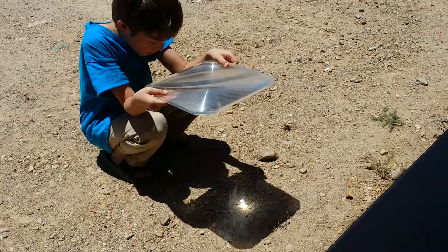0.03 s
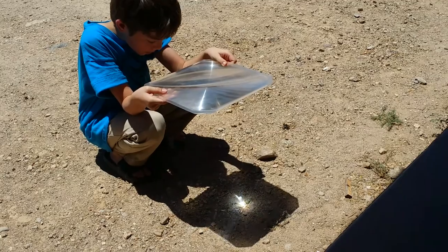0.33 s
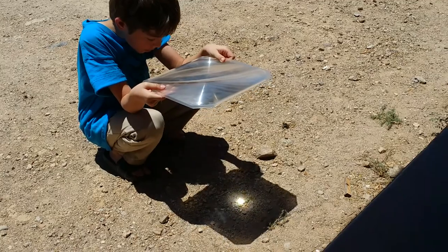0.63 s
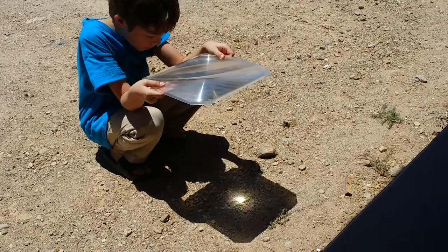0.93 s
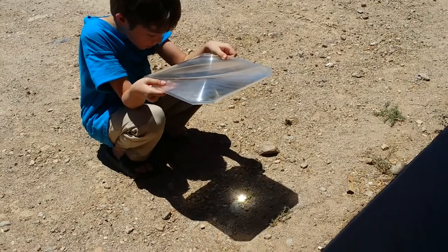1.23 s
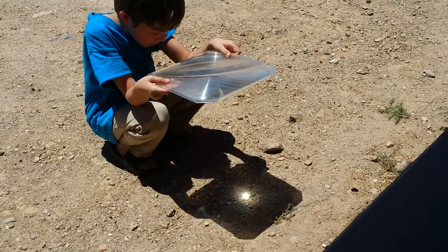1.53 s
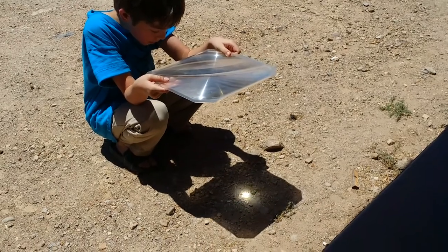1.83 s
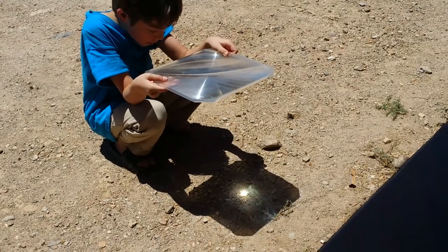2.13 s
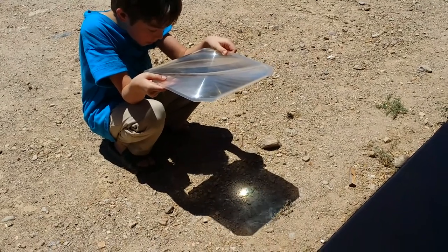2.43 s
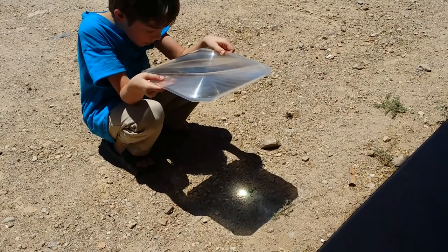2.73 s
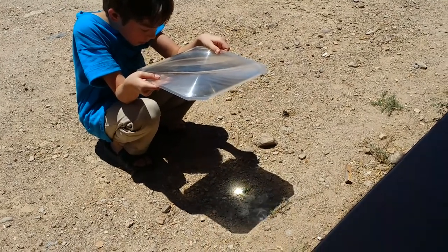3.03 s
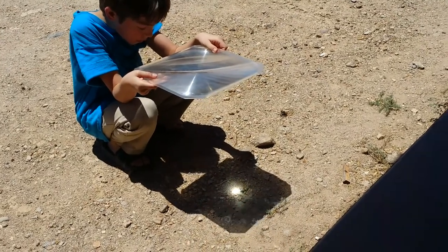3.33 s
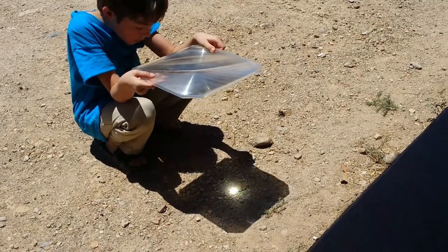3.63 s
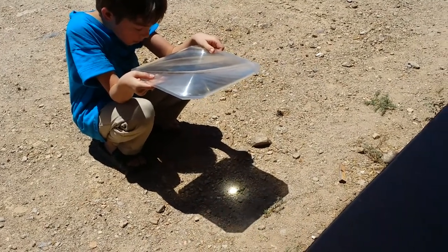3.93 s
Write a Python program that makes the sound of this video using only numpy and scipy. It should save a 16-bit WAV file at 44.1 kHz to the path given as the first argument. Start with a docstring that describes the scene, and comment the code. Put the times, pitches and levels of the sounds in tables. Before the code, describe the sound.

Bits of dry ground burst with brief, sharp clicks under a sunlit lens, with short gaps between them. Soft wind buffets the microphone unevenly, and a faint outdoor hiss lies behind.

```python
"""Sunlight popping dry ground

A flat lens burns a spot on dry ground; heated bits burst with sharp, tiny pops. Each pop is one
pressure spike that rings the two microphone ports, scatters off things nearby and returns from the yard.
Gusts buffet the ports, mostly the right one, over a distant outdoor wash, a far-off whirr, a faint hiss,
a thin insect buzz and a brief high whine."""
import sys
import numpy as np
from scipy import signal
from scipy.fft import rfft, irfft, next_fast_len
from scipy.io import wavfile
from scipy.ndimage import uniform_filter1d, map_coordinates

SR = 44100
rng = np.random.default_rng(int(sys.argv[2]) if len(sys.argv) > 2 else 0)


def waveform_to_disk(signal):
    """Save audio, clipped to [-1, 1], as 16-bit WAV at the path in sys.argv[1]."""
    frames = np.transpose(np.atleast_2d(signal))
    scaled = np.clip(frames, -1, 1) * 32767
    samples = np.round(scaled).astype(np.int16)
    wavfile.write(sys.argv[1], SR, samples)


N = 4 * SR
TIME_S = np.arange(N) / SR
ECHO_TIME_S = np.arange(SR // 2) / SR


def amp(db):
    return 10 ** (np.asarray(db) / 20)


def unit_rms(x):
    return x / np.sqrt(np.mean(x ** 2) + 1e-20)


def unit_energy(x):
    return x / np.sqrt(np.sum(x ** 2) + 1e-20)


def at_hz(rows, hz):
    """(Hz, value) rows interpolated on a log axis."""
    knots_hz, values = np.transpose(rows)
    return np.interp(np.log(hz + 1), np.log(knots_hz + 1), values)


def over_time(rows):
    """(seconds, value) rows interpolated to every sample."""
    return np.interp(TIME_S, *np.transpose(rows))


def wobble(knots_per_s):
    """A smooth random curve."""
    return map_coordinates(rng.standard_normal(4096), [TIME_S * knots_per_s], mode="wrap")


def phrase(start_s, end_s, fade_s=0.025):
    """A gate that fades in, holds and fades out."""
    return np.clip(np.minimum(TIME_S - start_s, end_s - TIME_S) / fade_s, 0, 1)


def filtered(x, gain_at_hz):
    """Zero-phase filter."""
    size = next_fast_len(N + SR // 2)
    return irfft(rfft(x, size) * gain_at_hz(np.fft.rfftfreq(size, 1 / SR)), size)[..., :N]


def coloured(white, spectrum):
    """Noise of rms 1 shaped by (Hz, dB) rows."""
    return unit_rms(filtered(white, lambda hz: amp(at_hz(spectrum, hz))))


def narrow_noise(centre_hz, half_width_hz):
    """Narrow-band noise of rms 1."""
    white = rng.standard_normal(N)
    return unit_rms(filtered(white, lambda hz: 1 / (1 + ((hz - centre_hz) / half_width_hz) ** 2)))


# Port cavities, left then right. Each row: centre in Hz, width in Hz, resonance strength in dB.
PORT_RESONANCES = [(7190, 480, 1.5), (8190, 960, -5.5)]

def port_ring(hz, port, extra_db=0):
    """Gain of the small cavity behind a microphone port (0 left, 1 right)."""
    centre_hz, width_hz, db = PORT_RESONANCES[port]
    resonance = 1j * hz * width_hz / (centre_hz ** 2 - hz ** 2 + 1j * hz * width_hz)
    return np.abs(1 + amp(db + extra_db) * resonance)


# Each row: frequency in Hz, relative density in dB.
WASH_SPECTRUM = [(30, 3), (100, 7), (300, 7), (600, -1), (950, 0.5), (1250, -1), (1600, -8.5),
                 (2300, -13.5), (4000, -27), (9000, -41)]
# Each row: time in seconds, relative level in dB.
WASH_LEVELS = [(0, -63), (.82, -63.5), (.93, -68), (1.3, -62.5), (1.42, -68), (1.95, -63), (2.4, -65.5),
               (2.72, -64.5), (2.9, -69.5), (3.4, -64.5), (3.8, -64.5), (4, -71.5)]

def distant_wash(gain_db=7.5, correlation=0.27):
    """Low outdoor noise from far away, partly alike in both ports."""
    shared = np.sqrt(correlation) * rng.standard_normal(N)
    separate = np.sqrt(1 - correlation) * rng.standard_normal((2, N))
    return amp(over_time(WASH_LEVELS) + gain_db) * coloured(shared + separate, WASH_SPECTRUM)


# Each row: frequency in Hz, relative density in dB.
HISS_SPECTRUM = [(500, -17.5), (2500, 5.5), (4500, 4), (10000, 1.5), (14400, 4.5), (14800, -9)]
# Each row: time in seconds, relative level in dB.
HISS_LEVELS = [(0, -72), (.78, -73), (.97, -78), (1.25, -74.5), (1.55, -78), (1.9, -73), (2.3, -72),
               (2.95, -78.5), (3.4, -72.5), (3.85, -70.5), (3.94, -78)]

def breeze_hiss(left_db=6, right_db=7):
    """A faint hiss that swells with the breeze and rings each port."""
    out = np.zeros((2, N))
    for port, db in enumerate((left_db, right_db)):
        noise = coloured(rng.standard_normal(N), HISS_SPECTRUM)
        out[port] = amp(db) * filtered(noise, lambda hz: port_ring(hz, port, extra_db=1))
    return amp(over_time(HISS_LEVELS)) * out


# Each row: time in seconds, level in dB.
WHIRR_LEVELS = [(0, -89), (1.28, -70.5), (1.7, -77.5), (1.94, -61), (2.05, -73), (2.14, -64), (2.3, -91)]

def far_whirr():
    """A narrow band of distant noise swells and fades."""
    return amp(over_time(WHIRR_LEVELS)) * narrow_noise(centre_hz=1223, half_width_hz=54)


def high_whine(pitches_hz=(6630, 7580), level_db=-75):
    """Two faint, wavering tones sound together briefly on the left."""
    tones = sum(np.sin(2 * np.pi * hz * TIME_S + wobble(knots_per_s=15)) for hz in pitches_hz)
    left = amp(level_db) * phrase(start_s=1.68, end_s=2.0) * tones
    return np.array([left, np.zeros(N)])


# Each row: start in seconds, end in seconds, level on the left in dB.
INSECT_PHRASES = [(.11, .46, -70.5), (.6, .92, -74), (1.02, 1.37, -73), (2.02, 2.3, -70.5),
                  (2.57, 3.17, -75), (3.49, 3.88, -70.5)]

def insect_buzz(right_db=-8.5):
    """A thin buzz that starts and stops, a little to the left."""
    gate = sum(amp(db) * phrase(start_s, end_s) for start_s, end_s, db in INSECT_PHRASES)
    buzz = [amp(db) * narrow_noise(centre_hz=8130, half_width_hz=290) for db in (0, right_db)]
    return gate * np.array(buzz)


# Each row: centre in seconds, level in dB, pitch in Hz, half-width in seconds.
EDDIES = [(.026, -6.5, 128, 0.0038), (.045, -17.5, 134, 0.0015), (.166, -7, 173, 0.0023),
          (0.181, -7, 110, 0.0019), (0.278, -16.5, 107, 0.0024), (0.338, -14, 136, 0.0023),
          (.535, -18, 96, 0.0056), (.599, -14.5, 107, 0.0032), (.658, -23.5, 151, 0.0047),
          (1.749, -17.5, 123, 0.0035), (1.832, -18, 116, 0.0022), (1.882, -13, 142.4, 0.0031),
          (2.031, -18.5, 97, 0.0026), (2.298, -21, 91, 0.0028), (3.149, -23.5, 155.3, 0.0058),
          (3.178, -22.5, 84, 0.0082), (3.299, -14, 115, 0.0037), (3.427, -21.5, 136, 0.0039),
          (3.493, -14, 112, 0.001), (3.54, -20, 140, 0.0028), (3.697, -15, 129, 0.0019),
          (3.714, -17.5, 102, 0.0039), (3.766, -17, 141, 0.0031), (3.813, -16.5, 87.6, 0.0036)]

def eddy_thumps(skew=0.48, puff_db=1.5, puff_hz=422.5, puff_exponent=2.79):
    """An eddy crossing the port gives one or two lopsided pressure swings and a puff of fine turbulence."""
    out = np.zeros(N)
    turbulence = amp(puff_db) * narrow_noise(puff_hz, half_width_hz=74)
    for centre_s, db, hz, half_width_s in EDDIES:
        near = np.abs(TIME_S - centre_s) < 10 * half_width_s
        offset_s = TIME_S[near] - centre_s
        phase = 2 * np.pi * hz * offset_s + np.pi * rng.uniform(-1, 1)
        swing = np.sin(phase + skew * np.sin(phase))
        puff = (hz / puff_hz) ** puff_exponent * turbulence[near]  # stronger in faster eddies
        out[near] += amp(db) * (swing + puff) / np.cosh(offset_s / half_width_s)
    return out


# Each row: frequency in Hz, relative density in dB.
BUFFET_SPECTRUM = [(15, -9.5), (70, 1), (110, 1), (170, -8), (250, -15.5), (400, -32.5), (600, -40),
                   (3000, -100)]
# Wind pressure on each port. Each row: time in seconds, level in dB.
GUSTS_LEFT = [(0, -39), (.25, -32.5), (.33, -36.5), (.56, -38.5), (.77, -53.5), (.82, -29), (.92, -64),
              (1.28, -47.5), (1.7, -67), (1.9, -66.5), (2.24, -28.5), (2.28, -52.5), (3.08, -62.5),
              (3.42, -41.5), (3.78, -45), (4, -71)]
GUSTS_RIGHT = [(0, -17.5), (.06, -36), (.14, -26.5), (.3, -30), (.45, -33.5), (.72, -30.5), (.76, -48),
               (.85, -38.5), (.92, -54), (1.04, -40), (1.09, -42.5), (1.3, -37), (1.41, -60), (1.64, -53),
               (1.7, -34), (1.9, -32), (2.08, -44), (2.17, -32.5), (2.32, -44.5), (2.56, -36), (2.7, -52),
               (3.08, -41.5), (3.26, -30), (3.35, -37), (3.55, -37), (3.66, -45), (3.72, -33.5),
               (3.84, -27), (3.9, -53.5), (4, -78)]

def wind(flutter_db=3.8):
    """Turbulence buffets each port on its own; the right one faces the wind and takes the eddies."""
    out = np.zeros((2, N))
    for port, gusts in enumerate((GUSTS_LEFT, GUSTS_RIGHT)):
        level_db = over_time(gusts) + flutter_db * wobble(knots_per_s=38)
        out[port] = amp(level_db) * coloured(rng.standard_normal(N), BUFFET_SPECTRUM)
    out[1] += eddy_thumps()
    return out


def near_scatter(delay_s=0.00023, t60_s=0.015):
    """A few milliseconds of reflections from stones, lens and body close by."""
    decay = (ECHO_TIME_S > delay_s) * amp(-60 * ECHO_TIME_S / t60_s)
    return unit_energy(rng.standard_normal(len(ECHO_TIME_S)) * decay)


# Each row: delay in seconds, level against the direct spike in dB, port (0 left, 1 right).
WALL_REFLECTIONS = [(.0079, -21, 1), (0.012, -14.5, 0), (0.0214, -14, 1)]

def wall_echoes(port):
    """Distinct echoes off hard surfaces that reach one port."""
    path = np.zeros(len(ECHO_TIME_S))
    for delay_s, db, echo_port in WALL_REFLECTIONS:
        if echo_port == port:
            path[round(delay_s * SR)] += amp(db)
    return path


# Each row: frequency in Hz, time to fall 60 dB in seconds.
YARD_DECAY = [(1000, 0.14), (4000, 0.2), (14000, 0.17)]
# Each row: frequency in Hz, relative gain in dB.
YARD_SPECTRUM = [(1000, 2), (4000, 4.5), (7500, 0.5), (14000, 1)]

def yard_echo(delay_s=0.007, hold_s=0.019, grain_depth=0.091, late_db=-11, late_t60_s=0.45):
    """Diffuse, grainy echoes arrive after a gap, hold briefly and die into a quieter, longer tail."""
    size = len(ECHO_TIME_S)
    grains = np.exp(grain_depth * unit_rms(uniform_filter1d(rng.standard_normal(size), size=24)))
    hz, frame_s, bands = signal.stft(rng.standard_normal(size) * grains, SR, nperseg=256)
    early = amp(-60 * np.maximum(frame_s - hold_s, 0) / at_hz(YARD_DECAY, hz)[:, None])
    late = amp(late_db - 60 * frame_s / late_t60_s)
    colour = amp(at_hz(YARD_SPECTRUM, hz))[:, None]
    _, echo = signal.istft(bands * (early + late) * colour, SR, nperseg=256)
    return unit_energy(echo[:size] * (ECHO_TIME_S > delay_s))


# A pop as each port hears it. Each row: frequency in Hz, relative gain in dB.
SPIKE_SPECTRUM_LEFT = [(200, -37), (900, -25.5), (1400, -9), (2500, -2.5), (3700, -4), (6000, -1),
                       (7300, 1.5), (9500, -1.5), (14500, -11.5)]
SPIKE_SPECTRUM_RIGHT = [(200, -29), (900, -11.5), (1500, -6), (2500, -10.5), (4500, -9), (6500, -6),
                        (8300, -1.5), (10000, -2), (14500, -2)]

def pressure_spike(corner_hz, port, rolloff_order=2.73, size=2048):
    """The click of one burst, dull above its corner, ringing one port."""
    hz = np.fft.rfftfreq(size, 1 / SR)
    colour = amp(at_hz((SPIKE_SPECTRUM_LEFT, SPIKE_SPECTRUM_RIGHT)[port], hz))
    rolloff = 1 / np.sqrt(1 + (hz / corner_hz) ** (2 * rolloff_order))
    cepstrum = irfft(np.log(colour * port_ring(hz, port) * rolloff + 1e-6))
    # Minimum phase: nothing sounds before the burst.
    cepstrum[1:size // 2] *= 2
    cepstrum[size // 2 + 1:] = 0
    return unit_energy(irfft(np.exp(rfft(cepstrum))))


# Each row: start in seconds, relative level in dB, treble corner in Hz.
BURSTS = [(0.4343, -37, 8000), (0.5906, -31, 9000), (.6025, -8.5, 9000), (.7120, -13.5, 7500),
          (0.7845, -14, 7400), (1.4602, -20, 6100), (1.7966, -13.5, 7340), (2.3362, -39.5, 7500),
          (2.434, -41, 8000), (2.6543, -20, 5970), (2.7491, -11.5, 9800), (2.8619, -34, 1690),
          (3.2349, -17.5, 8000), (3.245, -21, 3860), (3.3297, -11, 11100), (3.4088, -36, 6840)]

def pops(port_db=(0, -3.5), scatter_db=-6, yard_db=(-10.5, -5)):
    """Heated bits burst at one spot: direct spike, near scatter, wall and yard echoes."""
    out = np.zeros((2, N + SR))
    for port in (0, 1):
        early = amp(scatter_db) * near_scatter() + wall_echoes(port)
        for start_s, db, corner_hz in BURSTS:
            path = early + amp(yard_db[port]) * yard_echo()
            path[0] += 1  # direct sound
            pop = signal.fftconvolve(pressure_spike(corner_hz, port), path)
            out[port, round(start_s * SR):][:len(pop)] += amp(db + port_db[port]) * pop
    return out[:, :N]


def scene():
    """The pops over the outdoor background and the wind."""
    return pops() + distant_wash() + breeze_hiss() + wind() + insect_buzz() + high_whine() + far_whirr()


def record(dry, cutoff_hz=14700):
    """The camera's steep band limit."""
    return filtered(dry, lambda hz: 1 / np.sqrt(1 + (hz / cutoff_hz) ** 120))


dry = scene()
out = record(dry)
waveform_to_disk(out)
```